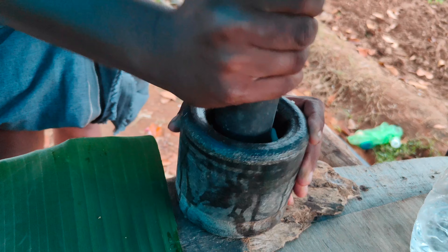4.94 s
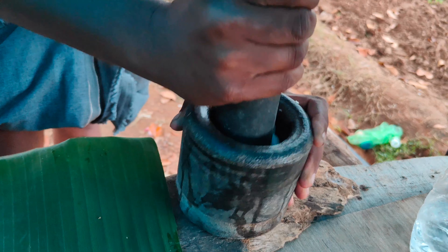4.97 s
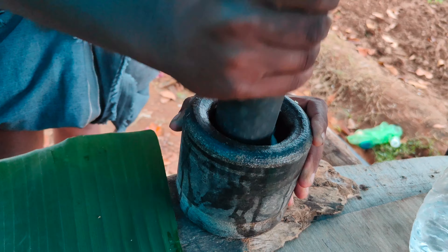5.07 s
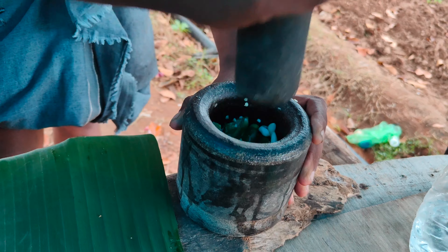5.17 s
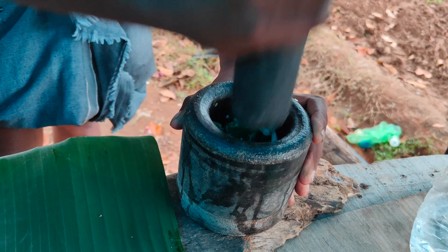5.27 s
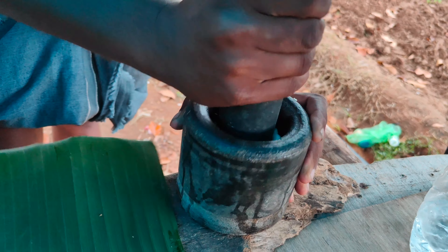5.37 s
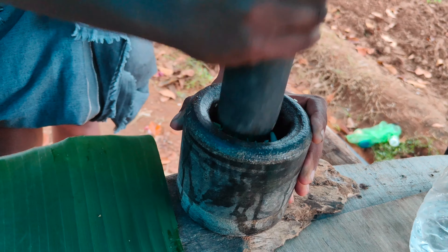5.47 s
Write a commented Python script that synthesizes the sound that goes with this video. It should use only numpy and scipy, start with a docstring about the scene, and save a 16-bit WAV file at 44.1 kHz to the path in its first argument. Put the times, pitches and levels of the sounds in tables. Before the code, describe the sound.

Outdoors, with the microphone very near, a pestle strikes food in a stone mortar at a steady pace. Soft early blows give way to strong, bassy thuds through the plank. Every hit has a short bright crunch with tiny cracks, followed by mortar knocks, rustling mash and low rumble. One longer gap includes a faint scrape; distant birds chirp briefly.

```python
"""Garlic and chillies in a stone mortar

A stone pestle pounds the food in a mortar on a plank outdoors, close to a two-port microphone.
Each blow crushes the food and thuds into the plank, then the mortar rocks and knocks as it settles.
Thuds, knocks, ticks and cracks are struck decaying modes; crushing, rustling and crumbs are gated noise.
The pestle drags on the wall as noise through resonances; far birds are gliding, blurred sines.
Quiet air, filtered noise, lies under everything.
"""
import sys
import numpy as np
from scipy import signal
from scipy.fft import rfft, irfft, next_fast_len
from scipy.io import wavfile
from scipy.ndimage import map_coordinates

SR = 44100
rng = np.random.default_rng(int(sys.argv[2]) if len(sys.argv) > 2 else 0)


def waveform_to_disk(signal):
    """Save audio, clipped to [-1, 1], as 16-bit WAV at the path in sys.argv[1]."""
    frames = np.transpose(np.atleast_2d(signal))
    scaled = np.clip(frames, -1, 1) * 32767
    samples = np.round(scaled).astype(np.int16)
    wavfile.write(sys.argv[1], SR, samples)


N = 243720

# Outdoor air, relative spectrum: hz, level_db
AIR_SPECTRUM = [(15, -12), (25, 10), (97, 12.5), (293, -27.5), (427, -5.5), (503, -6), (1610, -44.5),
                (2350, -28), (3160, -39.5), (4250, -25.5), (4610, -30.5), (5880, -10), (7110, -23),
                (7920, -21.5), (16000, -62)]

# Pestle blows: bottom_s, crush_lead_s, touch_db, crush_db, thud_db, sway_db
BLOWS = [(0.1385, 0.015, -34, -12.5, -25, -13.5), (0.475, 0.014, -37, -8, -16, -7),
         (0.8242, 0.011, -17, -10, -11, -7), (1.161, 0.019, -25, -12.5, -4.5, -1.5),
         (1.524, 0.011, -30, -17, -8, -4.5), (2.0414, 0.0082, -15, -12.5, -5, -8.5),
         (2.3973, 0.0099, -24.5, -14.5, -1.5, 1.5), (2.7534, 0.011, -27, -11, -1, -1),
         (3.136, 0.013, -27.5, -13, -4.5, -2), (3.5047, 0.011, -18.5, -10, -6.5, -4.5),
         (3.8696, 0.0084, -37, -10.5, -2.5, 0.5), (4.2319, 0.01, -30, -11, -2, -2.5),
         (4.6112, 0.009, -19.5, -11, -4, -5), (4.998, 0.0094, -16, -10, -3.5, -3),
         (5.3776, 0.0088, -13.5, -10.5, -4, -2.5)]
# Food being crushed, relative spectrum: hz, level_db
CRUSH_SPECTRUM = [(410, -33), (700, -11), (1150, -3), (1770, -13), (2330, 2), (3320, -7), (4210, 0),
                  (5060, -4), (6150, -0.5), (6920, -9.5), (8530, -16.5), (10400, -14), (11500, -8),
                  (14600, -22), (16000, -38)]
# Loose mash and crumbs, relative spectrum: hz, level_db
MASH_SPECTRUM = [(710, -14.5), (1200, -11), (1500, -10.5), (2000, -7.5), (2450, -6.5), (3250, -12.5),
                 (4300, -10.5), (5840, -11.5), (7020, -20.5), (7900, -21.5), (10000, -27), (11800, -25),
                 (14000, -39.5), (16000, -62.5)]
# Crumbs that burst or drop at known moments, strong and faint: start_s, level_db
TIMED_CRUMBS = [(0.5511, -21), (0.9004, -40.5), (1.2372, -33.5), (1.6027, -26.5), (1.6457, -35.5),
                (2.0624, -30.5), (2.1097, -44.5), (2.4199, -24.5), (2.7774, -22), (2.822, -26),
                (2.8642, -33.5), (3.1644, -27), (3.1949, -27.5), (3.5733, -33), (3.621, -32.5),
                (3.8964, -30), (3.944, -35), (3.9866, -27.5), (4.2652, -25.5), (4.6698, -33), (4.6832, -21),
                (4.696, -23), (5.0208, -21.5), (5.0663, -25), (5.095, -38.5), (5.4469, -29)]
# Mash rustling under the resting pestle: time_s, level_db
STIRRING = [(0, -69), (.2, -45.5), (.45, -70), (.6, -55), (.8, -68.5), (.95, -49), (1.13, -64), (1.4, -54),
            (1.75, -50), (2.05, -56), (2.35, -66), (3.0, -62.5), (4.15, -62), (4.9, -63), (5.14, -50),
            (5.2, -43), (5.35, -53.5), (5.53, -57)]
# Small crumbs scattered behind every blow
STRAY_DB, STRAY_FROM_S, STRAY_OVER_S, STRAY_FADE_DB_PER_S = -39, .03, .18, 48.5
# The mash slumps after a blow: level, and dB gained per dB of thud
SETTLE_DB, SETTLE_GROWS = -37, 1.35
# When the slump peaks after the blow, how fast it swells and drops
SETTLE_S, SWELL_DB_PER_S, DROP_DB_PER_S = .089, 178, 236

# Hard bits cracking per blow: count, centre pitch, pitch spread, ring length in cycles
SNAPS, SNAP_HZ, SNAP_OCTAVES, SNAP_CYCLES = 5, 3000, .9, 36
# Crack level relative to the crush, and the time window centred on the blow
SNAP_DB, SNAP_OVER_S = -10, .012

# Fast plank modes: pitch_hz, level_db, t60_s
PLANK_MODES = [(148, 11, .06), (116, 1, .11), (233, -11, .12)]
# Slow plank sway: pitch_hz, level_db, t60_s
SWAY_MODES = [(91, -8, .28)]
# Ground rumble, relative spectrum: hz, level_db
GROUND_SPECTRUM = [(15, -12), (26, 2), (45, -10.5), (70, -2), (90, -1), (150, -3.5), (220, -16),
                   (350, -24.5), (500, -66.5)]
# Mortar rattle after a blow, relative spectrum: hz, level_db
RATTLE_SPECTRUM = [(180, -13), (260, 4.5), (400, 2), (550, 2), (750, -2), (1050, -5.5), (1350, -7.5),
                   (1900, -14), (2500, -13), (3500, -47)]

# Mortar rocking on the plank: start_s, level_db
KNOCKS = [(0.151, -27), (0.202, -30), (0.486, -17), (0.836, -8.5), (0.868, -19), (1.173, -6),
          (1.194, -14.5), (1.212, -15), (1.242, -16.5), (1.275, -23), (1.534, -9), (1.571, -12.5),
          (1.603, -23.5), (1.646, -24), (2.054, -8), (2.089, -16), (2.412, -8), (2.449, -15), (2.47, -18),
          (2.518, -21.5), (2.611, -28), (2.77, -12.5), (2.807, -12), (2.871, -23.5), (2.964, -31.5),
          (3.076, -37.5), (3.149, -10), (3.205, -23.5), (3.261, -21), (3.343, -34), (3.517, -9.5),
          (3.568, -21.5), (3.622, -29.5), (3.71, -37), (3.886, -15), (3.917, -13), (3.922, -7.5),
          (3.943, -18.5), (3.993, -20.5), (4.079, -34.5), (4.249, -17), (4.263, -15.5), (4.286, -10.5),
          (4.345, -27.5), (4.396, -35), (4.627, -16), (4.685, -20.5), (4.721, -26.5), (5.011, -10.5),
          (5.39, -24), (5.447, -18.5)]
# Ringing mortar body: pitch_hz, level_db, t60_s
MORTAR_MODES = [(359.7, -10, 0.087), (439, -10, 0.074), (548.5, -4.5, 0.057), (674.4, 2.5, 0.033),
                (740, 1.5, 0.048), (859.5, -0.5, 0.03), (1007.5, -4.5, 0.061), (1331, -8.5, 0.035),
                (1847, -21, 0.036), (2290, -20, 0.03)]
ROCK_DB = 2.5  # left-right scatter of the knocks

# Stone ticking against stone: start_s, level_db
TICKS = [(0.2369, -16.5), (0.625, -8.5), (1.1443, -1.5), (1.514, -4), (1.698, -11), (1.7074, -22.5)]
# Ringing mortar rim: pitch_hz, level_db, t60_s
RIM_MODES = [(720, -12, 0.02), (1214, -2, 0.014), (1600, -2, 0.012), (2160, 3, 0.005), (2366, 0.5, 0.011),
             (3000, -4, .006), (3900, -7, 0.008), (8150, -24, .03)]
# Rattle behind a tick, relative spectrum: hz, level_db
TICK_SPECTRUM = [(300, -20), (700, 2), (1200, 3), (2500, 3), (4200, -18), (5500, -35.5), (16000, -51.5)]

# Pestle drags along the wall: start_s, length_s, level_db, brightness_db
STROKES = [(1.39, .11, -51, 1), (1.7, 0.087, -55, -0.5), (1.856, 0.16, -41.5, -3.5), (5.172, .2, -45.5, 4)]
# Mortar wall resonances: centre_hz, width_hz, level_db
WALL_RESONANCES = [(520, 80, -6), (740, 60, 8), (1066, 120, -1), (1500, 240, -1), (2200, 400, -8),
                   (4550, 600, -12)]
STROKE_EDGE_S = .025  # the drag takes hold and lets go

# Far birds and thin peeps: start_s, length_s, from_hz, to_hz, level_db
CHIRPS = [(2.275, 0.068, 2450, 2415, -49), (2.349, 0.059, 2413, 2410, -50),
          (2.901, 0.038, 3380, 3390, -38.5), (1.72, 0.09, 3420, 2980, -53), (2.918, 0.054, 3120, 2950, -42),
          (2.963, 0.068, 2710, 2670, -41), (3.022, 0.039, 3260, 2790, -45), (3.04, 0.069, 2770, 2560, -39),
          (3.058, .05, 2490, 2285, -45), (1.716, 0.044, 7950, 8400, -43), (3.421, 0.055, 3780, 3900, -66),
          (4.772, 0.0085, 8100, 8050, -41.5)]

# Colour difference between the ports: hz, left_minus_right_db
PORT_LEAN = [(500, 0.5), (1170, -1.5), (1800, 0), (2700, -1), (4200, 0.5), (6400, 7.5), (8000, -22.5),
             (9800, -15), (12000, -13.5), (15000, 2)]
# Phase difference between the ports: hz, left_lead_radians
PORT_LEAD = [(300, 0.7), (1030, 1.25), (2500, 1.43), (3200, 2), (4300, 0.8), (5000, 2.26), (8180, 1.74),
             (10800, 2), (12400, 6.6), (14300, 11)]
TOP_HZ = 16300  # band limit
SIDES = np.array([[.5], [-.5]])  # left and right halves of a difference


def amp(db):
    """Turns decibels into linear gain."""
    return 10 ** (np.asarray(db) / 20)


def unit(x):
    """Scales x to an rms of 1."""
    return x / np.sqrt(np.mean(x ** 2) + 1e-20)


def along(points, hz):
    """Reads a (hz, value) curve on a log frequency axis."""
    f, v = np.transpose(points)
    return np.interp(np.log(hz + 1), np.log(f + 1), v)


def level(rows):
    """Turns (time_s, level_db) rows into gain per sample, -120 dB outside them."""
    s, db = np.transpose(rows)
    return amp(np.interp(np.arange(N) / SR, s, db, -120, -120))


def wobble(rate):
    """Draws a smooth random curve with rate knots a second."""
    knots = rng.standard_normal(N // 16)
    return map_coordinates(knots, [np.arange(N) * rate / SR])


def filtered(x, response):
    """Shapes x with a complex response of frequency, zero-padded for the tail."""
    m = next_fast_len(N + SR // 2)
    hz = np.fft.rfftfreq(m, 1 / SR)
    return irfft(rfft(x, m) * response(hz), m)[..., :N]


def noise(spectrum, channels=1, gate=1):
    """Gates white noise, then colours it; rms about 1 with the gate open."""
    white = rng.standard_normal((channels, N))
    return filtered(gate * white, lambda hz: unit(amp(along(spectrum, hz))))


def ring(modes, t, scatter_db, attack, detune=0):
    """Sums damped modes; each strike scatters their strength and may shift their pitch at random."""
    hz, db, t60 = np.transpose(modes)[:, :, None]
    strength, shift = rng.standard_normal((2,) + db.shape)
    decay = amp(db + scatter_db * strength - 60 * t / t60)
    waves = decay * np.sin(2 * np.pi * hz * (1 + detune * shift) * t)
    return waves.sum(0) * (1 - np.exp(-t / attack))


def add(out, s, x):
    """Mixes x into out from second s on."""
    at = out[..., round(s * SR):][..., :x.shape[-1]]
    at += x[..., :at.shape[-1]]


def ports(x, apart):
    """Puts a near source at both ports: colour and phase differ, a share arrives unrelated."""
    def response(hz):
        return amp(SIDES * along(PORT_LEAN, hz)) * np.exp(1j * SIDES * along(PORT_LEAD, hz))
    return filtered(x[0] + apart * x[1:], response)


def outdoors():
    """Quiet air: slowly wavering noise, alike at both ports only in the bass."""
    shared, apart = noise(AIR_SPECTRUM, channels=2) * amp(-56.5 + 3 * wobble(1.6))
    apart = filtered(apart, lambda hz: np.clip(hz / 1200, .25, 1))
    return np.array([shared + apart, shared - apart])


def crumbs():
    """Lists the crumbs at known moments, and four small ones at chance moments behind each blow."""
    when, size = rng.random(size=(2, len(BLOWS), 4))
    after = STRAY_OVER_S * when
    s = np.array(BLOWS)[:, :1] + STRAY_FROM_S + after
    db = STRAY_DB - STRAY_FADE_DB_PER_S * after - 10 * size
    return TIMED_CRUMBS + list(zip(s.ravel(), db.ravel()))


def rustling():
    """Gain of the mash's rustle: slow stirring, and a slump per blow, louder the harder the thud."""
    out, t = level(STIRRING), np.arange(SR // 2) / SR
    swell_db = SWELL_DB_PER_S * (t - SETTLE_S)
    drop_db = DROP_DB_PER_S * (SETTLE_S - t)
    shape_db = np.minimum(swell_db, drop_db)
    for s, *_, thud_db, _ in BLOWS:
        add(out, s, amp(SETTLE_DB + SETTLE_GROWS * thud_db + shape_db))
    return out


def food():
    """Crushing swells until the pestle bottoms out; the mash then crackles, rustles and settles."""
    crush, mash, t = np.zeros(N), np.zeros(N), np.arange(SR // 4) / SR
    for s, lead, touch_db, crush_db, _, _ in BLOWS:
        touch = amp(touch_db - 60 * t / .022) * (1 - np.exp(-t / .002))
        add(crush, s - lead, touch)
        rise = t[t < lead]
        swell = amp(crush_db - 22 * (1.5 - rise / lead))
        add(crush, s - lead - .001, swell)
        # A sharp stop with a faint longer tail
        stop = amp(-60 * t / .013) + amp(-15.5 - 60 * t / .11)
        add(crush, s - .001, amp(crush_db) * stop)
        add(mash, s, amp(crush_db - 21 - 60 * t / .15))
    for s, db in crumbs():
        add(mash, s, amp(db - 60 * t / .034) * (1 - np.exp(-t / .0028)))
    snaps = unit(amp(3 * wobble(900) + 1.5 * wobble(120)))  # fibres snap in clumps
    grit = unit(amp(4 * wobble(600) + 2.5 * wobble(130)))
    rustle = rustling() * amp(.55 * wobble(30) + 2.9 * wobble(400))
    crushing = noise(CRUSH_SPECTRUM, channels=3, gate=crush * snaps)
    settling = noise(MASH_SPECTRUM, channels=3, gate=mash * grit + rustle)
    return ports(crushing + settling, apart=.92)


def cracks():
    """Seeds and skins crack under the pestle, each a short damped mode with its own pitch."""
    out, t = np.zeros((3, N)), np.arange(SR // 20) / SR
    for s, _, _, crush_db, _, _ in BLOWS:
        pitch, size = rng.standard_normal(size=(2, SNAPS))
        moments = s + SNAP_OVER_S * (rng.random(SNAPS) - .5)
        pitches = np.minimum(SNAP_HZ * 2 ** (SNAP_OCTAVES * pitch), SR / 4)
        levels = crush_db + SNAP_DB + 4 * size
        for when, hz, db in zip(moments, pitches, levels):
            crack = ring([(hz, db, SNAP_CYCLES / hz)], t, scatter_db=1, attack=.00018)
            add(out[0], when, crack)
    return ports(out, apart=0)


def thuds():
    """The plank is pushed away, rings fast, sways on slowly; ground rumbles, mortar rattles after."""
    push, shake, chatter = np.zeros((3, N))
    t = np.arange(SR // 2) / SR
    for s, _, _, _, thud_db, sway_db in BLOWS:
        fast = amp(thud_db) * ring(PLANK_MODES, t, scatter_db=.7, attack=.01)
        slow = amp(sway_db) * ring(SWAY_MODES, t, scatter_db=.7, attack=.01)
        add(push, s - .0022, -(fast + slow))  # negative: pushed away
        shake_onset = 1 - np.exp(-(t / .0096) ** 2)
        add(shake, s, amp(sway_db - 6.5 - 60 * t / .38) * shake_onset)
        chatter_onset = 1 - np.exp(-(t / .0095) ** 2)
        chatter_decay = amp(-60 * t / .25) + amp(-41.5 - 60 * t / .75)
        add(chatter, s, amp(thud_db - 11) * chatter_decay * chatter_onset)
    ground = noise(GROUND_SPECTRUM, channels=3)
    rumble = shake * (ground[0] + .25 * ground[1:])
    rattle = noise(RATTLE_SPECTRUM, channels=3) * amp(2.2 * wobble(150))
    return push + rumble + chatter * ports(rattle, apart=.57)


def knocks():
    """Each rocking contact rings the mortar, a little differently at each port, and nudges the plank."""
    out, t = np.zeros((2, N)), np.arange(SR // 4) / SR
    for s, db in KNOCKS:
        common = ring(MORTAR_MODES, t, scatter_db=1, attack=.0014, detune=.041)
        difference = .41 * ring(MORTAR_MODES, t + .00044, scatter_db=3, attack=.0012, detune=.04)
        apart = difference * [[1], [-1]]
        nudge = amp(-9) * ring(PLANK_MODES, t, scatter_db=4, attack=.0083)
        lean = amp(ROCK_DB * rng.standard_normal() * SIDES)
        add(out, s, amp(db) * (lean * (common + apart) + nudge))
    return out


def ticks():
    """Hard contacts strike the rim's modes, with a short noise rattle behind."""
    out, after, t = np.zeros((3, N)), np.zeros(N), np.arange(SR // 8) / SR
    for s, db in TICKS:
        add(out[0], s, amp(db) * ring(RIM_MODES, t, scatter_db=2, attack=.0004, detune=.015))
        add(after, s, amp(db - 16 - 60 * t / .094))
    rattle = noise(TICK_SPECTRUM, channels=3)
    return ports(out + after * rattle, apart=.54)


def drag():
    """Uneven friction sounds through the mortar's wall resonances; each stroke has its own brightness."""
    def wall(f):
        return sum(amp(db) * 1j * f * w / (c * c - f * f + 1j * f * w) for c, w, db in WALL_RESONANCES)
    friction = filtered(rng.standard_normal((3, N)), wall)
    rub = unit(friction * amp(2.9 * wobble(25)))
    low = filtered(rub, lambda hz: 1 / (1 + (hz / 900) ** 4))
    high = rub - low
    out, t = np.zeros((3, N)), np.arange(N) / SR
    for s, length, db, bright_db in STROKES:
        inside_s = np.minimum(t - s, s + length - t)
        press = np.clip(inside_s / STROKE_EDGE_S + .5, 0, 1)
        out += amp(db) * press * (low + amp(bright_db) * high)
    return ports(out, apart=.14)


def birds():
    """Short whistles glide with unsteady pitch and level, blurred by distance."""
    out = np.zeros((2, N))
    for s, length, from_hz, to_hz, db in CHIRPS:
        u = np.arange(round(length * SR)) / (length * SR)  # progress from 0 to 1
        waver = 60 * np.sin(2 * np.pi * (3 * u + rng.random()))
        hz = from_hz + (to_hz - from_hz) * u + waver
        whistle = np.sin(2 * np.pi * np.cumsum(hz) / SR)
        flutter = amp(np.interp(8 * u, range(9), rng.normal(-3, 4, size=9)))
        add(out, s, amp(db) * np.sin(np.pi * u) ** .65 * flutter * whistle)
    t = np.arange(SR // 8) / SR
    echoes = rng.standard_normal((2, len(t))) * amp(-60 * t / .09)
    return signal.fftconvolve(out, echoes / np.linalg.norm(echoes[0]), axes=1)[:, :N]


def scene():
    """Mixes all layers at their own levels."""
    return outdoors() + food() + cracks() + thuds() + knocks() + ticks() + drag() + birds()


def record(dry):
    """Rounds peaks off just below full scale, then keeps nothing above the band limit."""
    soft = dry / (1 + np.abs(dry / .97) ** 8) ** (1 / 8)
    return filtered(soft, lambda hz: hz < TOP_HZ)


dry = scene()
out = record(dry)
waveform_to_disk(out)
```